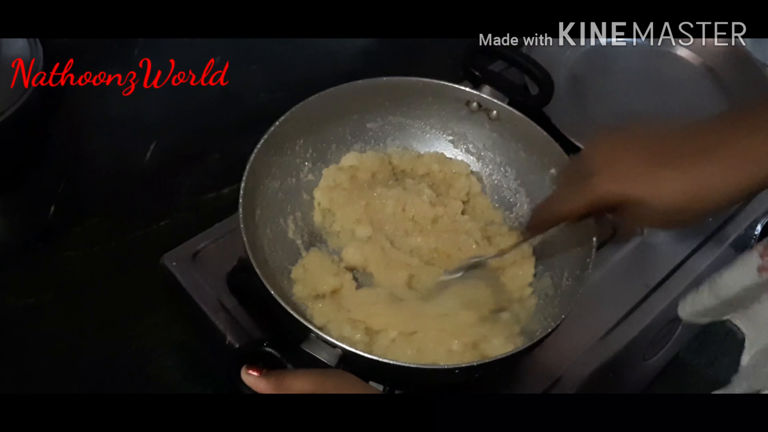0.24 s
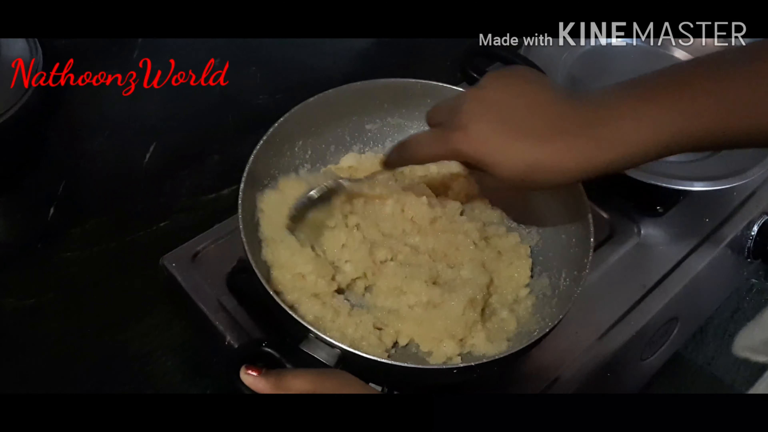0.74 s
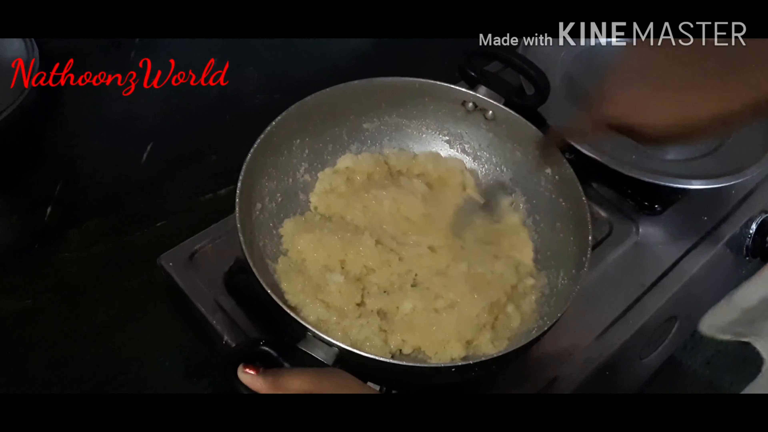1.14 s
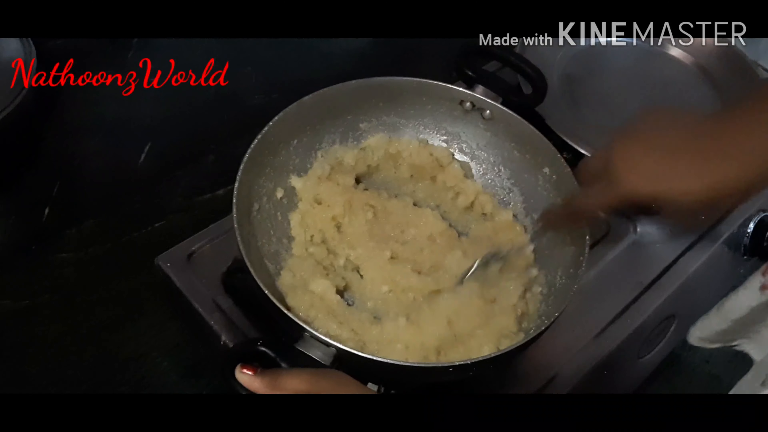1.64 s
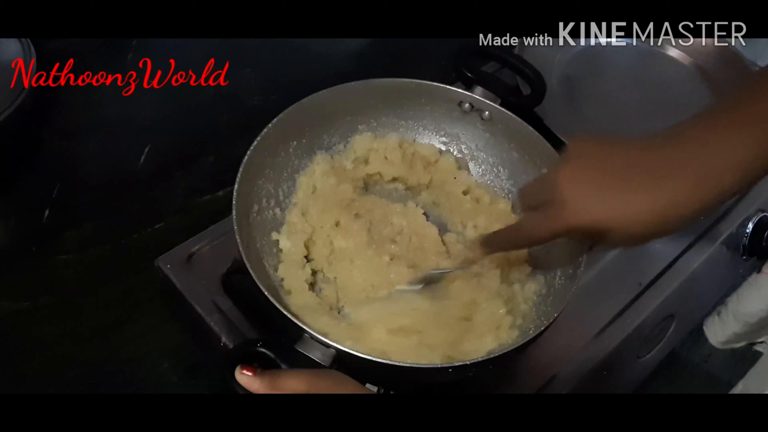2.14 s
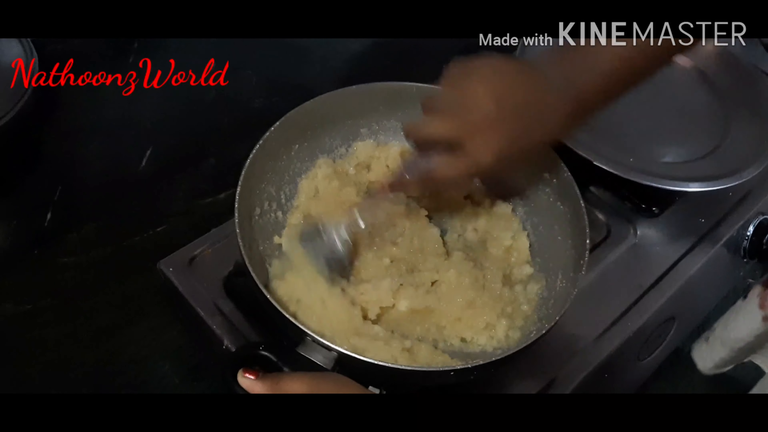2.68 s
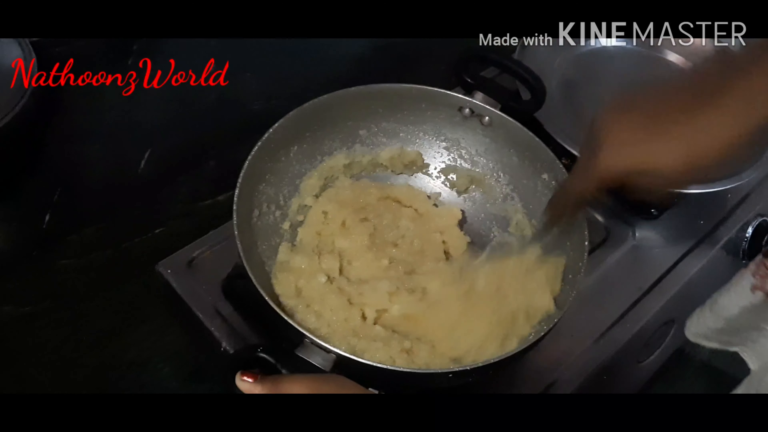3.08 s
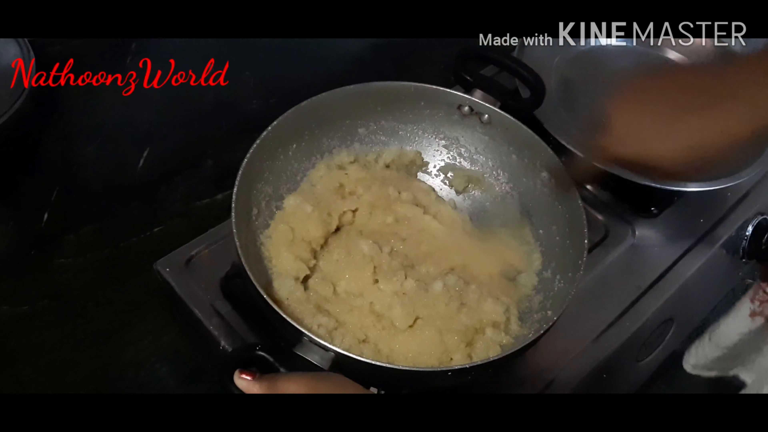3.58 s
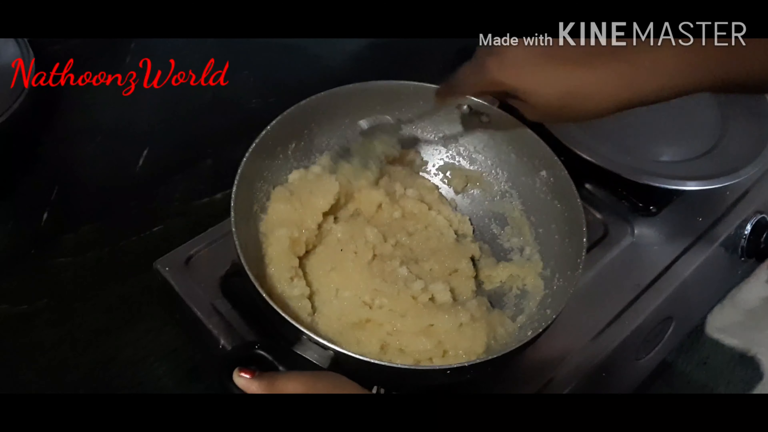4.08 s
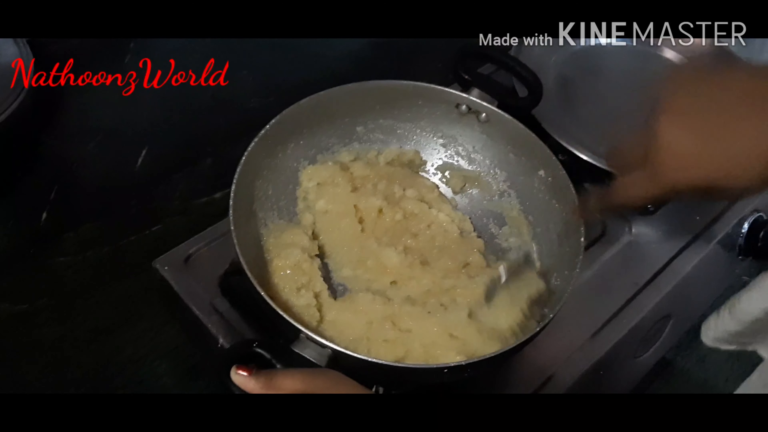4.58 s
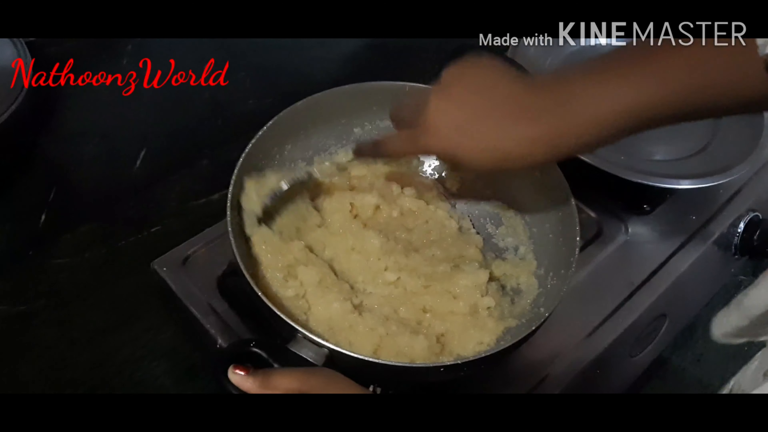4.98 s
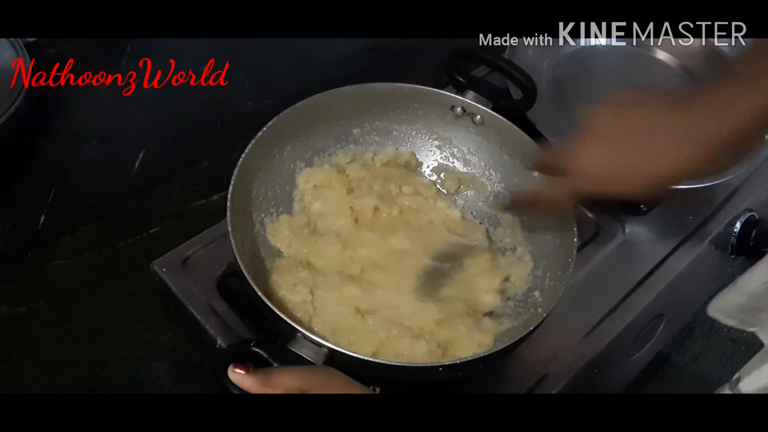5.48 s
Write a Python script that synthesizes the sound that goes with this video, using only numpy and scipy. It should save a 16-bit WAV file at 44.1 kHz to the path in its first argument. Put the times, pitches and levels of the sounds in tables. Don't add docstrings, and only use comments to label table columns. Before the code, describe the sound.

A metal spoon knocks and scrapes in quick uneven strokes round a thin pan of thick, grainy paste in a small hard kitchen.

```python
import sys
import numpy as np
from scipy import signal
from scipy.fft import rfft, irfft, next_fast_len
from scipy.io import wavfile
from scipy.ndimage import uniform_filter1d

SR = 44100
rng = np.random.default_rng(int(sys.argv[2]) if len(sys.argv) > 2 else 0)


def attenuation_scalar(level_db):
    decades = np.asarray(level_db, float) / 20
    return 10 ** decades


def store_pcm(level_fs):
    pcm = np.round(np.clip(level_fs, -1, 1) * 32767).astype(np.int16)
    wavfile.write(sys.argv[1], SR, np.atleast_2d(pcm).T)


N = 252379
STEP = 32


def evened(x):
    return x / np.sqrt(np.mean(x ** 2) + 1e-20)


def read(points, hz):
    f, value = np.transpose(points)
    return np.interp(np.log(hz + 1), np.log(f + 1), value)


def colour(x, points, share=1):
    size = next_fast_len(x.shape[-1])
    gain = attenuation_scalar(share * read(points, np.fft.rfftfreq(size, 1 / SR)))
    return irfft(rfft(x, size) * gain, size)[..., :x.shape[-1]]


def band(x, lo_hz, hi_hz):
    sections = signal.butter(2, [lo_hz, hi_hz], "bandpass", fs=SR, output="sos")
    return signal.sosfilt(np.vstack([sections, sections]), x)


def resonate(x, hz, width):
    turn = np.exp(2j * np.pi * np.cumsum(hz * np.ones(len(x))) / SR)
    r = np.exp(-np.pi * width / SR)
    return 2 * (turn * signal.lfilter([1 - r], [1, -r], x / turn)).real


def ring(modes, size=4096):
    t = np.arange(size) / SR
    out = np.zeros(size)
    for k, (hz, width, db) in enumerate(modes):
        decay = np.sqrt(width) * np.exp(-np.pi * width * t)
        out += (-1) ** k * attenuation_scalar(db) * decay * np.sin(2 * np.pi * hz * t)
    return out


def wander(per_s, count):
    knots = rng.standard_normal((count, int(N / SR * per_s) + 2))
    at = np.arange(N) * per_s / SR
    return [evened(np.interp(at, np.arange(len(k)), k)) for k in knots]


def slopes(peak_s, rise_s, fade_s):
    late = np.arange(0, N, STEP) / SR - peak_s[:, None]
    rise = -late / (abs(rise_s)[:, None] + 1e-4)
    fade = late / (abs(fade_s)[:, None] + 1e-4)
    return 20 * np.where(late < 0, rise, fade) ** 1.292


def summed(db):
    return np.repeat(np.sqrt((attenuation_scalar(db) ** 2).sum(0)), STEP)[:N]


# frequency in Hz, likeness from -1 to 1.
PORT_LIKENESS = [(60, 0.55), (180, 0.75), (550, 0.44), (1650, 0.22), (4970, -0.066), (15000, 0.15)]


def pair(a, b):
    size = a.shape[-1]
    same = np.clip(read(PORT_LIKENESS, np.fft.rfftfreq(size, 1 / SR)), -1, 1)
    return np.array([a, irfft(same * rfft(a) + np.sqrt(1 - same ** 2) * rfft(b), size)])


# frequency in Hz, level in dB per Hz.
HUSH = [(20, -16), (60, -5.5), (200, -2.5), (500, -9), (1200, -1), (2060, -0.5), (2600, -5), (4600, -4.5),
        (6000, -18), (15000, -8.5)]
# frequency in Hz, level in dB per Hz.
RUMBLE = [(15, -40), (30, -11), (55, -3.5), (90, -5.5), (140, -9), (300, -47)]
# peak in seconds, rumble in dB, drumming in dB,
# seconds to rise 20 dB, seconds to fade 20 dB (signs of the two times do not matter).
COUNTER_JOLTS = [(.06, -70, -60, -5, .4), (.56, -70, -66.5, -0.3, .6), (1.0, -61, -70, 0.2, .3),
                 (1.2, -66, -68, 0.2, 0.5), (1.53, -62, -58.5, 0.16, 0.4), (2.05, -78, -70, 1.5, 2),
                 (2.47, -63.5, -60, 0.13, .35), (3.09, -68.5, -65.5, 0.6, 0.3),
                 (3.81, -71.5, -62, 0.5, 0.3), (4.35, -59, -46.5, 0.15, 0.2),
                 (4.7, -69.5, -56.5, -0.1, 0.2), (5.15, -67, -55.5, 0.11, 0.1), (5.46, -65, -58, 0.1, 0)]


def background():
    a, b, c, d = rng.standard_normal((4, next_fast_len(N)))
    s, low_db, drum_db, rise_s, fade_s = np.transpose(COUNTER_JOLTS)
    below = slopes(s, rise_s, fade_s)
    low = attenuation_scalar(-84) + summed(low_db[:, None] - below)
    drum = attenuation_scalar(-86) + summed(drum_db[:, None] - below)
    rumble = low * evened(colour(pair(c, d), RUMBLE))[:, :N]
    drumming = 0.69 * drum * evened(band(pair(d, a), 134.4, 303))[:, :N]
    hush = attenuation_scalar(-61.5) * evened(colour(pair(a, b), HUSH))[:, :N]
    return hush + rumble + drumming


# frequency in Hz, seconds to die by 60 dB.
ROOM_DECAY = [(250, 0.37), (660, 0.37), (1740, 0.4), (4590, 0.34), (12000, 0.35)]


def walls(wet_db, near_db, size=20000, count=36):
    taps = np.zeros((2, size))
    at = np.arange(160, size - 20, 20)
    at = at + rng.integers(0, 20, (2, len(at)))
    np.put_along_axis(taps, at, rng.choice([-1., 1.], at.shape), 1)
    hz, t, z = signal.stft(taps, SR, nperseg=256)
    dying = attenuation_scalar(-60 * t / read(ROOM_DECAY, hz)[:, None])
    tail = signal.istft(z * dying, SR, nperseg=256)[1][:, :size]
    near = rng.standard_normal((2, size)) * np.exp(-np.arange(size) / SR / 0.0013)
    both = attenuation_scalar(wet_db) * tail / np.linalg.norm(tail[0]) + attenuation_scalar(near_db) * near / np.linalg.norm(near[0])
    both[[0, 1], rng.integers(0, count, 2)] += 1
    return pair(*both)[:, :size * 4 // 5]


def kitchen(x, wet_db, near_db, count=6):
    place = np.arange(N) / SR * 13.5
    out = np.zeros((2, N))
    for k in range(count):
        away = (place - k + count / 2) % count - count / 2
        share = np.cos(np.pi / 2 * np.clip(away, -1, 1))
        out += signal.oaconvolve((x * share)[None], walls(wet_db, near_db), axes=1)[:, :N]
    return out


# time in seconds, peak level in dB.
TICK_TIMES = [
    (1.104, -19),
]
# frequency in Hz, width in Hz, level in dB.
TICK_MODES = [(2090, 130, -4), (3380, 130, 0.5), (4200, 400, -6)]


def tick():
    out = np.zeros(N)
    s, db = TICK_TIMES[0]
    sound = band(ring(TICK_MODES), 1550, 5000)
    out[round(s * SR) - 20:][:4096] = attenuation_scalar(db) * sound / abs(sound).max()
    return out


# time in seconds, peak in dB,
# thud in dB, crack in dB, main ring in Hz.
SPOON_KNOCKS = [(0.039, -29.5, -2.5, 5.5, 2660), (0.145, -15.5, -13, -9, 885),
                (0.529, -10.5, -19, -5.5, 944), (0.86, -16, -8.5, -6.5, 829), (1.16, -27, -22, -15, 1020),
                (1.509, -18.5, -7.5, -11, 940), (2.078, -22, -9, -11, 960),
                (2.448, -2.5, -25.5, -11, 1530), (2.728, -20, -6, -20, 970),
                (3.461, -26.5, -20, -7, 2050), (3.624, -23.5, -23, -2, 2100),
                (4.213, -15.5, -7.5, 1, 2680), (4.352, -9.5, -3, -3, 1660), (4.678, -23, -8, 3, 1100),
                (5.007, -14.5, -7, -5, 790), (5.125, -8, -12.5, -13, 937), (5.422, -4.5, -28, -4.5, 943),
                (1.235, -29, -15, -16, 2140), (1.245, -16.5, -17, -17, 2200), (2.761, -18.5, -11, -19, 820),
               (2.937, -10, -24, -14, 1280), (3.029, -32, -23, 7.5, 1130), (3.746, -15, -10, -1.5, 1300),
               (3.78, -15, -11, -28, 1100), (4.297, -31, -2.5, -13, 1240), (4.317, -30, 7, 1, 1290),
               (4.686, -23, -14, -12, 1100), (3.355, -40, -19, 6, 2000), (4.428, -27.5, -11, -8, 1500),
               (5.509, -17.5, -6, -14, 890)]


def knocks():
    out, t = np.zeros(N + 4096), np.arange(4096) / SR
    upper, lower = ring(WALL_MODES + RIM_MODES), band(t == 0, 320, 910)
    upper, lower = upper / abs(upper).max(), lower / abs(lower).max()
    for s, db, thud_db, crack_db, hz in SPOON_KNOCKS:
        main = 0.61 * np.sin(2 * np.pi * hz * t) * np.exp(-t / 0.0033)
        main += 1.07 * upper * np.exp(-t / 0.0031)
        main += 0.35 * (t < 0.0001)
        noise = evened(colour(rng.standard_normal(4096), GRIT_HISS))
        crack = noise * np.exp(-t / 0.0029) * (1 - np.exp(-t / 0.0001))
        knock = main + attenuation_scalar(thud_db) * lower + 0.84 * attenuation_scalar(crack_db) * crack
        out[round(s * SR) - 20:][:4096] += attenuation_scalar(db) * knock
    return out[:N]


def friction(per_s, spread_db, judder_db):
    size = attenuation_scalar(spread_db * np.minimum(rng.exponential(1, N), 3.4)) * rng.choice([-1., 1.], N)
    clicks = size * (rng.random(N) < per_s / SR)
    return evened(clicks * attenuation_scalar(judder_db * wander(70, count=1)[0]))


def family(force, modes, drift_db):
    out = np.zeros(N)
    for (hz, width, db), feed in zip(modes, wander(9, count=len(modes))):
        r = np.exp(-np.pi * width / SR)
        gain = attenuation_scalar(db) * np.sqrt(1 - r * r) / np.sqrt(2)
        poles = [1, -2 * r * np.cos(2 * np.pi * hz / SR), r * r]
        out += signal.lfilter([gain, 0, -gain], poles, force * attenuation_scalar(drift_db * feed))
    return out / np.linalg.norm(attenuation_scalar(np.array(modes)[:, -1]))


# start in seconds, pressure in dB,
# seconds to fade 20 dB, spoon resonance in Hz, depth in the paste in dB.
DRAG_STROKES = [(0.037, -32, 0.0051, 2440, -7), (0.145, -36.5, 0.1032, 1190, 0.5),
                (0.528, -27.5, 0.0268, 1050, -3.5), (0.859, -40, 0.05, 1060, 7.5),
                (1.159, -36, 0.08, 1300, -4.5), (1.511, -39.5, 0.1346, 1190, 6),
                (2.077, -42, 0.06, 1080, -5), (2.448, -24, 0.0427, 1530, -9), (2.728, -47, .11, 991, 11),
                (3.459, -38, .12, 2050, -3.5), (3.597, -44.5, 0.13, 2100, -6),
                (3.622, -39, 0.2068, 2300, -2), (4.213, -43, .025, 2000, 8.5),
                (4.353, -33.5, 0.16, 1450, 1.5), (4.649, -60.5, .05, 1980, 11.5),
                (4.677, -37.5, 0.1, 1130, 1), (5.006, -40.5, 0.0236, 965, 9),
                (5.124, -33.5, 0.14, 1600, 2.5), (5.421, -26, .08, 1260, -2)]
# peak in seconds, pressure in dB,
# seconds to rise 20 dB, spoon resonance in Hz, depth in the paste in dB.
SWELL_STROKES = [(0.093, -49.5, 0.12, 1080, 3.5), (0.22, -34, 0.0961, 1940, -2.5),
                 (0.61, -39.5, 0.16, 1050, 2.5), (0.952, -40, 0.15, 1290, -0.5),
                 (1.245, -35, 0.15, 2070, -6), (1.332, -35.5, .12, 1220, 0),
                 (1.597, -34.5, 0.1156, 1750, -4), (1.851, -32.5, 0.1559, 2090, -4.5),
                 (1.957, -43, 0.12, 1390, 3.5), (2.13, -36, 0.1, 1520, 3), (2.2, -44.5, 0.07, 1720, 1.5),
                 (2.5, -36, 0.16, 1600, -1), (2.635, -43, 0.12, 1200, 4.5), (2.764, -39.5, 0.17, 1040, 2.5),
                 (2.926, -33, 0.2, 1300, -8.5), (3.15, -40.5, 0.13, 1190, 3.5),
                 (3.24, -42, 0.1558, 1150, 3), (3.7, -39.5, 0.14, 1030, 3.5), (3.859, -46, 0.08, 1150, 13),
                 (4.315, -45, 0.17, 1710, 7.5), (4.765, -33.5, 0.1242, 1900, -3.5),
                 (5.06, -52, 0.17, 1140, 3), (5.51, -39.5, 0.12, 1290, 4.5), (5.569, -36, 0.08, 2050, -5)]
# peak in seconds, level in dB,
# seconds to rise 20 dB, spoon resonance in Hz.
SINGING = [(.165, -36.5, 0.13, 1190), (1.64, -35, .11, 900), (1.88, -35, 0.16, 875),
           (0.59, -20, 0.047, 1100), (1.333, -35, 0.15, 1180), (2.127, -32, 0.0543, 1080),
           (2.545, -33, 0.12, 1000), (2.9, -29, 0.05, 1260), (2.97, -28, .07, 1230),
           (4.72, -31.5, 0.01, 2250), (2.62, -37, 0.02, 2450), (3.255, -35.5, 0.08, 1140),
           (3.8, -26.5, 0.0671, 1100), (4.725, -23.5, 0.1, 1140), (5.15, -30.5, 0.12, 1660),
           (5.46, -25.5, 0.04, 1180), (5.557, -30, 0.04, 2050)]
# offset in dB, dB per dB of depth,
# dB per octave of spoon resonance, steepness of rise and fade (a plain factor).
PART_ANSWERS = [
    (0., 1, 0., 0.74),
    (1.5, 0.4437, -2, 0.93),
    (2.5, 0.2651, 1, 1.01),
    (0., 0, 1, 1.135),
]


def strokes():
    rows = np.array(DRAG_STROKES + SWELL_STROKES + [row + (0,) for row in SINGING])
    s, db, span, hz, depth = rows.T
    kind = np.repeat(np.arange(3), [len(DRAG_STROKES), len(SWELL_STROKES), len(SINGING)])
    lands = s[kind == 0]
    landed = lands[np.searchsorted(lands, s, "right") - 1]
    below = slopes(s, span, span * np.where(kind == 0, 1, 0.85))
    below[np.arange(0, N, STEP) / SR < landed[:, None]] = 200
    octaves = np.log2(hz / 1450)
    song = [-200, -18 * np.maximum(octaves, 0), 18 * np.minimum(octaves, 0), -200]
    gains = []
    for (offset_db, per_depth, per_octave, steep), song_db in zip(PART_ANSWERS, song):
        rub_db = offset_db + per_depth * depth + per_octave * octaves
        top = db + np.where(kind == 2, song_db, rub_db)
        gains.append(uniform_filter1d(summed(top[:, None] - steep * np.minimum(below, 200)), 40))
    weight = attenuation_scalar(db[:, None] - np.minimum(below, 80)) ** 4
    return gains, np.repeat(hz @ weight / weight.sum(0), STEP)[:N]


# frequency in Hz, width in Hz, level in dB.
BOWL_MODES = [(333, 20, -10.5), (364.7, 13, -0.5), (467.3, 9.4, -4), (524.6, 11, -1), (569.4, 37, 4),
              (690, 27, -1)]
# frequency in Hz, width in Hz, level in dB.
WALL_MODES = [(827, 26, -5), (944, 37, 1.5), (1097, 50, -4), (1190, 39, 0.5), (1243, 27, -4),
              (1300, 41, -11)]
# frequency in Hz, width in Hz, level in dB.
RIM_MODES = [(1530, 31, -1), (1706, 46, -1), (1842, 31, -2.5), (1950, 87, 1), (2185, 140, -2.5),
             (2375, 54, -2), (2760, 71, -14)]
# frequency in Hz, width in Hz, level in dB.
EDGE_MODES = [(3390, 74, -4), (4550, 210, -13), (5760, 320, -6), (7690, 190, -6)]
# frequency in Hz, level in dB per Hz.
GRIT_HISS = [(1710, -14.5), (2900, 0), (4960, -5.5), (5930, -3.5), (6840, -10), (8650, -12), (14600, -11.5),
             (15400, -20), (16000, -34)]


def scrape():
    force = friction(per_s=3000, spread_db=3.5, judder_db=2.5)
    (bowl, wall, rim, edge), spoon_hz = strokes()
    spoon = evened(resonate(resonate(force, spoon_hz, 310), spoon_hz, 324))
    out = attenuation_scalar(-3.5) * spoon * np.where(spoon_hz > 1400, rim, wall)
    parts = ((bowl, BOWL_MODES, -7.5), (wall, WALL_MODES, -7.5), (rim, RIM_MODES, -7.5),
             (edge, EDGE_MODES, -13))
    for level, modes, db in parts:
        out += attenuation_scalar(db) * family(force * level, modes, drift_db=2.5)
    broad = ((bowl, 350, 800, -1.5), (bowl, 640, 960, -4.5), (wall, 900, 1450, -5),
             (rim, 1400, 2900, -4), (rim, 2700, 4600, -12.5))
    for k, (level, lo_hz, hi_hz, db) in enumerate(broad):
        shifted = np.roll(force, (k + 1) * 2503)
        out += attenuation_scalar(db) * evened(band(shifted, lo_hz, hi_hz)) * level
    hiss = friction(per_s=9000, spread_db=3.5, judder_db=4.0) + 0.61 * force
    return out + attenuation_scalar(2.5) * evened(colour(hiss, GRIT_HISS)) * edge


# frequency in Hz, width in Hz, level in dB.
BARE_WALL_MODES = [(577, 11, -8.5), (1100, 5.3, -3), (1199, 4.6, -8), (1660, 6, -4), (2040, 11, -2.5),
                   (2450, 10, -1)]


def pan():
    x = scrape() + knocks()
    return band(x + attenuation_scalar(-28.0) * family(x, BARE_WALL_MODES, drift_db=1.0), 273, 21500)


def scene():
    far = signal.oaconvolve(tick()[None], walls(wet_db=-1.5, near_db=-11.0, count=1), axes=1)[:, :N]
    return background() + far + attenuation_scalar(-2.0) * kitchen(pan(), wet_db=-3.5, near_db=-7.0)


def low_pass(x):
    return signal.sosfilt(signal.butter(12, 16500, fs=SR, output="sos"), x)


# frequency in Hz, left minus right in dB.
PORT_LEAN = [(60, -5), (130, -11.5), (290, -0.5), (640, -4.5), (1410, -3.5), (3100, 0.5), (6820, -3),
             (15000, 5)]
# frequency in Hz, gain in dB.
MICROPHONE_COLOUR = [(700, 0.5), (1100, 0.76), (1700, 1.5), (2500, 0.6), (3600, 0.7), (5500, 0.44),
                     (9500, 0), (12500, -2), (15000, -2), (15400, -12), (16000, -32), (16600, -46)]


def record(dry):
    left = colour(dry[0], PORT_LEAN, share=0.53)
    right = colour(dry[1], PORT_LEAN, share=-0.43)
    return low_pass(colour(np.array([left, right]), MICROPHONE_COLOUR))


dry = scene()
out = record(dry)
store_pcm(out)
```